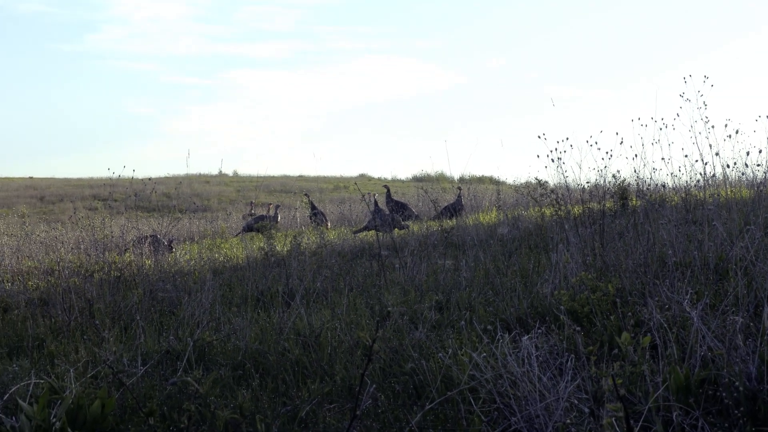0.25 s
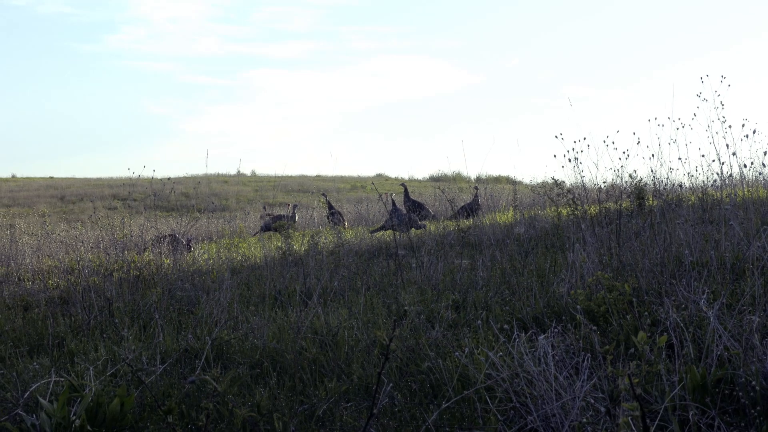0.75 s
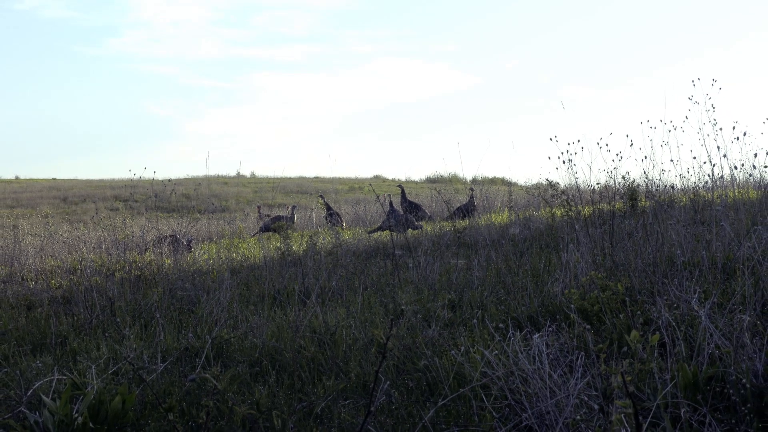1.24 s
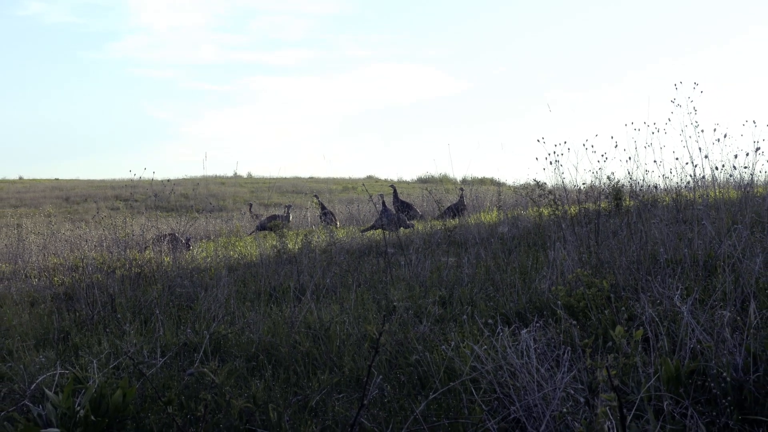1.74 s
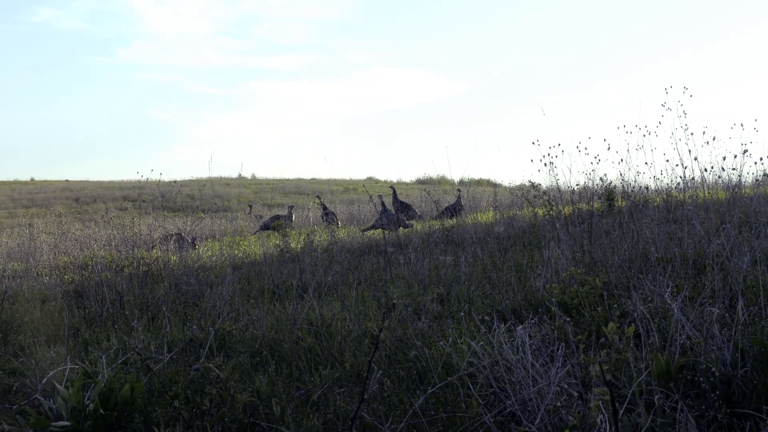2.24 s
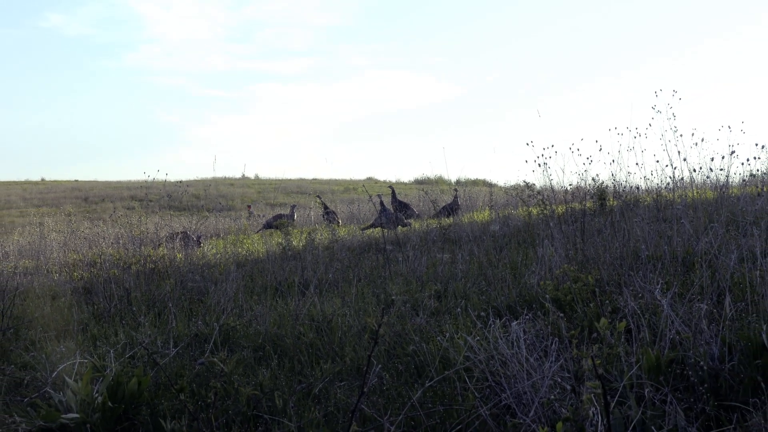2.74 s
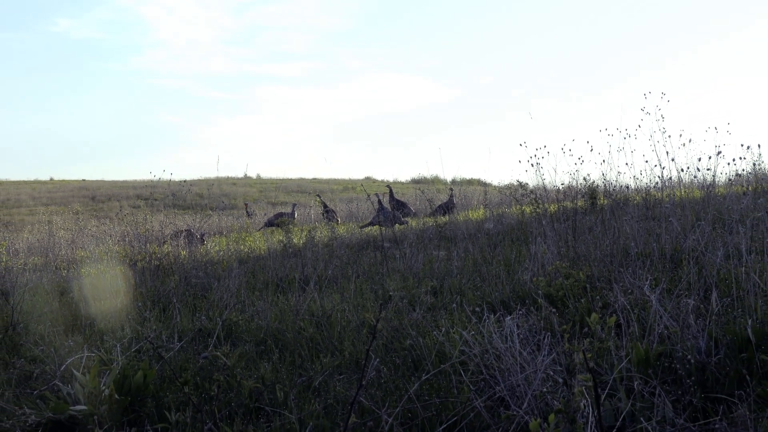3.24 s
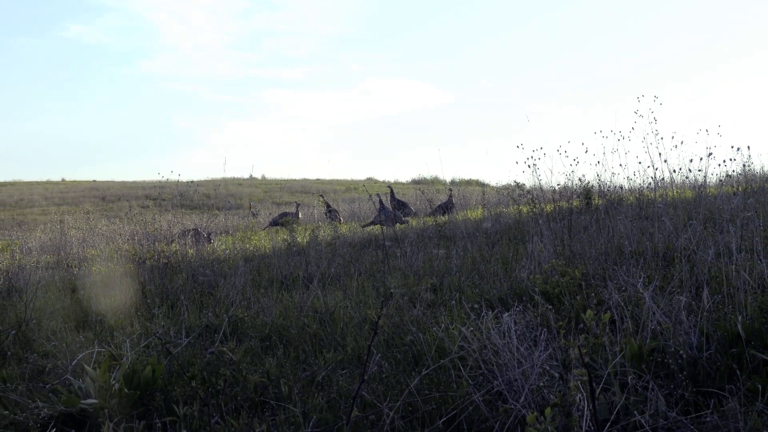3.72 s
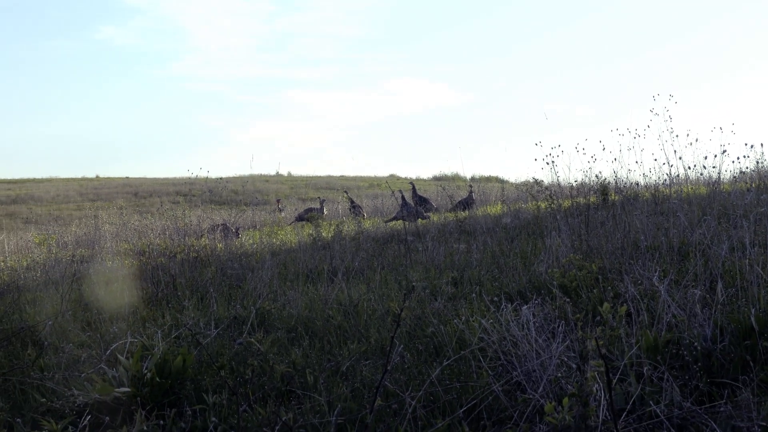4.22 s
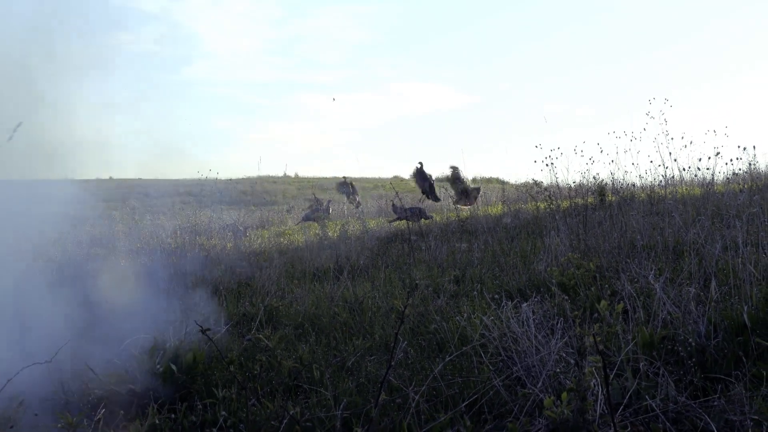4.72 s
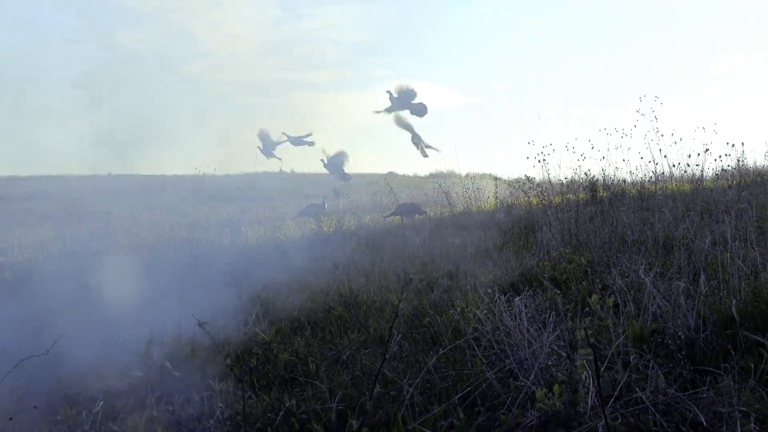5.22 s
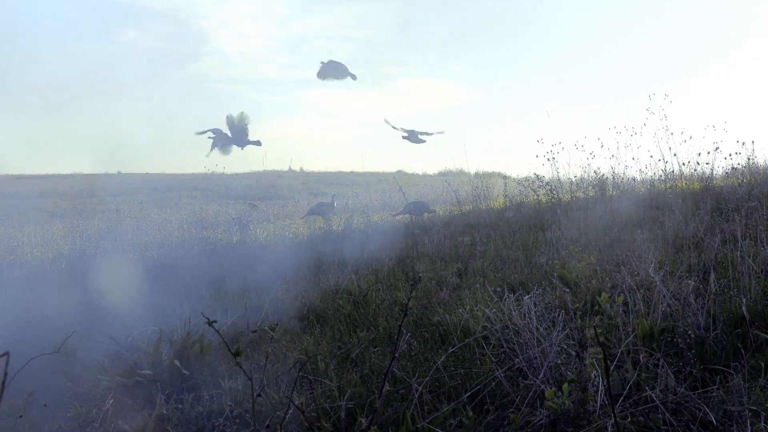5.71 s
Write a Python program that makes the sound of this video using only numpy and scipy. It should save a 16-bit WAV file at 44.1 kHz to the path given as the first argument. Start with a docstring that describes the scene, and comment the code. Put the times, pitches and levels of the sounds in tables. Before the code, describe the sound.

Open grassland on a calm morning: soft breeze, close rustles, one sharp tap near the microphone, and thin whistled bird notes on the right. After four seconds a gritty flint scrape and priming hiss lead instantly into a massive, distorted gunshot. Echo cracks scatter to the right, low boom rolls off the hills and decays, with a small rustle at the end.

```python
"""Flintlock shot over a quiet field

A quiet morning on open grass: a breeze and whistled bird notes built from pitch curves, with rustles close by.
The flint scrapes the steel as gritty noise bursts, the priming flares, and the charge goes off a tenth of
a second after the first scrape: a shock and a noise jet overload the input, and the microphone rings.
Shaped noise scatters the report over the grass, slaps it back from the slopes on the right and rolls it away."""
import sys
import numpy as np
from scipy import signal
from scipy.fft import rfft, irfft, next_fast_len
from scipy.io import wavfile

SR = 44100
rng = np.random.default_rng(int(sys.argv[2]) if len(sys.argv) > 2 else 0)


def pcm_store(signal):
    """Save signal as 16-bit PCM."""
    levels = np.round(np.clip(np.atleast_2d(signal), -1, 1) * 32767)
    wavfile.write(sys.argv[1], SR, levels.astype(np.int16).T)


N = 262874
T = np.arange(N) / SR   # s

# Colour tables give relative density before the noise is brought to unit rms;
# source levels are gains in dB; some sources add a common level of their own.

# far hush, colour: [f/Hz, density/dB per Hz]
HUSH_COLOUR = [(120, -21.5), (200, -5), (345, -9.5), (575, -5.5), (790, -1.5), (1000, -9.5), (1400, -18.5),
               (1900, -27), (3100, -27.5), (5600, -34), (8200, -35), (15500, -39.5)]
# far hush, stereo place: [f/Hz, left-right/dB]
HUSH_PAN = [(200, 7), (400, -4.5), (750, -17.5), (1500, -9.5), (4000, -5), (9000, 4)]
# breeze on the microphone, colour: [f/Hz, density/dB per Hz]
BREEZE_COLOUR = [(20, 5.5), (36, -0.5), (70, 0), (110, -4), (170, -15.5), (300, -23), (700, -57)]
# notes of a low far drone: [t/s, length/s, level/dB]
DRONE_NOTES = [(3.05, .21, -45), (3.56, .48, -45)]
# pitch curves of the song syllables, before each note's own ratio: {name: [t from the start/s, f/Hz]}
SYLLABLES = { "hook": [(0, 4100), (.035, 4580), (.054, 6150), (.074, 5100), (.088, 6100), (.105, 6230)],
             "arch": [(0, 4000), (.05, 4130), (.08, 4600), (.113, 6900), (.145, 4600), (.165, 3700),
             (.195, 3350)], "lift": [(0, 4100), (.024, 5250)], "drop": [(0, 5270), (.045, 3730)],
             "whistle": [(0, 2955), (.17, 3080)], "slur": [(0, 2980), (.015, 3170), (.045, 3240),
             (.068, 3480)], "flick": [(0, 2124), (.02, 2650), (.07, 3780)], "fall": [(0, 3350), (.03, 3150),
             (.085, 2200)], "dip": [(0, 2700), (.032, 1950), (.06, 2650)], "rasp": [(0, 8000),
             (.045, 7140)], }
# the clearest bird notes, by syllable: {name: [t/s, level/dB, pitch ratio]}
SONG = { "hook": [(.066, -50, .97), (.494, -51, .98)], "arch": [(.226, -50, 1), (.653, -48.5, .98)],
        "lift": [(.92, -52, .96), (1.537, -62, .97)], "drop": [(.957, -49, .98), (1.568, -64, .92),
        (2.648, -67, 1)], "whistle": [(.3, -63.5, 1.07), (.47, -62.5, 1), (.995, -58.5, 1),
        (1.13, -66, 1.22), (1.27, -71, 2.03), (1.53, -65, 1.1), (1.54, -66, 1.27), (3.35, -63.5, .9)],
        "slur": [(1.36, -62, 1.05), (1.92, -62, .57), (2.73, -62.5, .81), (2.99, -62, 1.13),
        (3.23, -61, .8), (4.03, -61.5, .83)], "flick": [(1.8, -62, 1.03), (2.05, -62.5, 1.05),
        (2.235, -61.5, 1.05), (2.37, -61.5, .94)], "fall": [(.38, -61, .9), (1.43, -62, .95),
        (1.81, -62, .92)], "dip": [(2.84, -62, 1), (3.515, -62, 1), (4.14, -61, 1)],
        "rasp": [(.77, -54, 1.1), (.825, -50.5, .99), (3.83, -60, .47)], }
# bird calls on two pitches at once: [t/s, level of the lower pitch/dB]
TWIN_CALLS = [(2.522, -54), (3.945, -55)]
# rustles close by: [t/s, level/dB, left-right/dB, decay/s]
RUSTLES = [(0, -50, 6, .38), (0, -46, 4, .03), (.078, -45, -1, .025), (.195, -46, 14, .022),
           (5.7, -46, 5, .12), (5.88, -37.5, 12, .2)]
# rustle colour: [f/Hz, density/dB per Hz]
RUSTLE_COLOUR = [(500, 15), (2000, 6.5), (4500, 2.5), (7000, -1), (10000, 1), (12300, 0.5), (15000, -9)]
# dry ticks close by: [t/s, level/dB]
TICKS = [(1.226, -54), (2.024, -56), (2.778, -55), (3.252, -48), (3.512, -56)]
# soft bumps close by: [t/s, level/dB, left-right/dB]
BUMPS = [(.6595, -34, 10), (1.2015, -40, 6)]
# returns from the far hills: [t/s, level/dB]
HILL_RETURNS = [(4.52, -45), (4.935, -28.5)]
# colour of the hill returns before the air dulls them: [f/Hz, density/dB per Hz]
ROLL_COLOUR = [(30, -5), (75, 2), (125, -1), (250, -7.5), (450, -18.5), (1100, -9), (1500, -9.5),
               (1900, -18), (2700, -21.5), (4500, -31.5), (7000, -42), (13000, -49.5)]
# stereo place of the hill returns: [f/Hz, left-right/dB]
ROLL_PAN = [(60, -13.5), (250, 2.5), (700, -15.5), (2000, -16.5), (10000, -12)]
# strong echoes from slopes and thickets: [t/s, peak level/dB, treble share/dB, thump share/dB]
ECHOES = [(4.483, -5, -4.5, -4), (4.5042, -5.5, -13, -9), (4.5214, -5, -17, -14), (4.572, -9, -17, -18),
          (4.6047, -9, -12, -16), (4.6253, -9.5, -10, -22), (4.669, -11.5, -32, -21),
          (4.695, -9.5, -29, -14.5), (4.747, -16.5, -27, -22), (4.8259, -19.5, -20, -5),
          (4.9485, -19.5, -13, -7), (4.9805, -19.5, -22, -4), (5.08, -19, -16, -14),
          (5.1334, -13, -20, -13), (5.274, -27, -16, -11)]
# colour of the echo cracks: [f/Hz, density/dB per Hz]
ECHO_COLOUR = [(300, -47), (700, -8), (1200, 3), (1900, 6.5), (2700, -1.5), (4000, -10), (7000, -32),
               (14000, -56)]
# sharp cracks on the right after the shot: [t/s, level/dB]
CRACKS = [(4.486, -14), (4.647, -18), (4.826, -28), (4.951, -25), (5.003, -28.5), (5.138, -20),
          (5.282, -36)]
# report thrown back by the field, colour at the start: [f/Hz, density/dB per Hz]
SCATTER_COLOUR = [(30, -17.5), (80, -6), (160, -5.5), (270, -2.5), (420, -9.5), (550, -16.5), (800, -29.5),
                  (1400, -29), (2600, -27), (5000, -29), (15500, -31.5)]
# time for the thrown-back report to fall by 60 dB: [f/Hz, T60/s]
SCATTER_T60 = [(50, 1.85), (130, 1.84), (260, 0.86), (500, 0.3), (2000, 1.6), (5000, 0.98), (12000, 0.62)]
# stereo place of the thrown-back report before it veers: [f/Hz, left-right/dB]
SCATTER_PAN = [(60, -2), (250, 1.5), (700, 15), (1500, -9), (5000, -8.5), (12000, -2.5)]
# flint on steel and the frizzen flying open: [t/s, level/dB, left-right/dB, decay/s]
LOCK_BITES = [(4.2479, -9.5, 25, 0.0044), (4.2536, -8, -2, 0.0064), (4.26, -24, -19, 0.0084),
              (4.267, -22, 11, 0.0036), (4.2738, -16.5, 8, 0.0023), (4.281, -33, -9, 0.02)]
# scrape colour: [f/Hz, density/dB per Hz]
LOCK_COLOUR = [(59, -29.5), (100, -8), (394, -18.5), (711, -19), (897, -9.5), (1230, -18.5), (2000, -5.5),
               (2270, -10), (2520, -5), (2920, -19), (3320, -13.5), (3930, -15), (8760, -21), (9730, -15),
               (15500, -24.5)]
# priming flame colour: [f/Hz, density/dB per Hz]
FLARE_COLOUR = [(40, -12), (150, -3.5), (400, 4.5), (650, -7), (1200, -13), (3000, -24.5), (14000, -28)]
# muzzle gas jet colour: [f/Hz, density/dB per Hz]
JET_COLOUR = [(40, -14), (150, -9), (330, 0), (450, 3), (600, -15.5), (900, -10), (2000, -15), (6000, -19),
              (15000, -28.5)]

FLASH_S, FIRE_S = 4.278, 4.352   # the priming flashes; flame and gas jet reach their top


def from_db(db):
    """Decibels to gain."""
    return 10 ** (np.asarray(db) / 20)


def rms_one(x):
    """Scale to unit rms."""
    return x / np.sqrt(np.mean(x ** 2) + 1e-20)


def at_hz(points, hz):
    """Read a table on a log-frequency axis."""
    points = np.array(points)
    return np.interp(np.log(np.maximum(hz, 1)), np.log(points[:, 0]), points[:, 1])


def panned(pan_db):
    """Left and right gains of constant power; positive leans left."""
    gains = from_db(np.array([[.5], [-.5]]) * pan_db)
    return gains / np.sqrt(np.mean(gains ** 2, axis=0))


def drift(per_s):
    """A random wander of unit rms that heads for a new value per_s times a second."""
    return rms_one(np.interp(T * per_s, np.arange(N), rng.standard_normal(N)))


def noise(spectrum, pan=None, grain_db=0):
    """Stereo noise of a given colour and unit rms; grain roughens its level into tiny pulses."""
    size = next_fast_len(N)
    hz = np.arange(size // 2 + 1) * SR / size
    grain = from_db(grain_db * np.clip(drift(2500), -2, 2))
    white = rng.standard_normal((2, N)) * grain
    low_cut = hz ** 2 / (hz ** 2 + 20 ** 2)
    gain = from_db(at_hz(spectrum, hz)) * low_cut
    if pan is not None:
        gain = gain * panned(at_hz(pan, hz))
    return rms_one(irfft(rfft(white, size) * gain, size)[:, :N])


def bands(x, count=12):
    """Split a sound into overlapping bands that sum to the whole."""
    size = next_fast_len(N)
    spectrum, hz = rfft(x, size), np.arange(size // 2 + 1) * SR / size
    centres = np.geomspace(45, 14000, count)
    for centre, weights in zip(centres, np.eye(count)):
        yield centre, irfft(spectrum * np.interp(hz, centres, weights), size)[:, :N]


def burst(start, rise, decay):
    """Envelope with a quick rise and an exponential fall."""
    age = np.maximum(T - start, 0)
    return (1 - np.exp(-age / rise)) * np.exp(-np.minimum(age / decay, 40))


def hump(start, length):
    """Envelope that swells and fades evenly."""
    return np.sqrt(np.maximum(np.sin(np.pi * np.clip((T - start) / length, 0, 1)), 0))


def surge(top, rise_db_per_s, fall_db_per_s, hold=0):
    """Envelope that grows exponentially to its top, holds and dies away."""
    before = rise_db_per_s * np.maximum(top - T, 0)
    after = fall_db_per_s * np.maximum(T - top - hold, 0)
    return from_db(-np.minimum(before + after, 200))


def ring(start, hz, decay):
    """A damped sine."""
    age = np.maximum(T - start, 0)
    return np.sin(2 * np.pi * hz * age) * np.exp(-np.minimum(age / decay, 40))


def snaps(rows):
    """Very short bright bursts, one for each row of time and level."""
    shape = sum(from_db(db) * burst(s, 0.00025, 0.0026) for s, db in rows)
    return shape * noise([(300, -6), (1800, -2), (4500, 5), (8000, -4), (15000, -10.5)])


def field_blur(x, decay_s):
    """Many faint reflections from the grass smear a sound, differently on each side."""
    length = SR // 2
    paths = rng.standard_normal((2, length)) * np.exp(-T[:length] / decay_s)
    return signal.fftconvolve(x[None], rms_one(paths) / np.sqrt(length), axes=1)[:, :N]


def whistle(name, start, ratio, wander, tempo=1):
    """One syllable, fading as it goes and thinner when high: the samples it covers and its wave."""
    fade_db, taper = -3.5, .2   # loss from start to end; share of the note spent swelling and dying
    thin_above_hz, thin_db_per_octave = 5400, -16
    age, hz = np.transpose(SYLLABLES[name])
    t = np.arange(0, age[-1], tempo / SR)
    span = int(max(start, 0) * SR) + np.arange(len(t))
    pitch = ratio * np.interp(t, age, hz)
    octaves_over = np.maximum(np.log2(pitch / thin_above_hz), 0)
    level_db = fade_db * t / age[-1] + thin_db_per_octave * octaves_over
    shape = from_db(level_db) * signal.windows.tukey(len(t), taper)
    phase = 2 * np.pi * np.cumsum(pitch * wander[span]) / SR
    return span, shape * np.sqrt(2) * np.sin(phase)


def breeze():
    """Low noise of wind on the microphone: a slightly swaying breeze with one opening gust."""
    steady = from_db(-43.6 + .6 * drift(4))
    gust = from_db(-39.5) * hump(0, .28)
    return steady * noise(BREEZE_COLOUR) * panned(-7) + gust * noise(BREEZE_COLOUR) * panned(4)


def far_drone():
    """A low far sine whose pitch wavers around 143 Hz."""
    shape = sum(from_db(db) * hump(s, length) for s, length, db in DRONE_NOTES)
    phase = 2 * np.pi * np.cumsum(143 + 2.5 * drift(32)) / SR
    return shape * np.sin(phase) * panned(3)


def insect():
    """A thin buzz: a narrow band of noise pulsing 90 times a second."""
    pulse = 1 + np.sin(2 * np.pi * 90 * T)
    return from_db(-78) * hump(3.0, 1.3) * noise([(7000, -38), (8250, 2), (9700, -41)]) * pulse


def meadow():
    """Breeze on the microphone, far hush, a low drone and an insect."""
    hush = from_db(-50.5) * noise(HUSH_COLOUR, HUSH_PAN)
    return breeze() + hush + far_drone() + insect()


def chorus(level_db=-72, distance_db=-7, blur_db=2, count=150):
    """Farther birds twitter one after another, each note at its own pitch, speed and distance."""
    song, wander = np.zeros(N), 1 + .02 * drift(250)
    names = ["slur", "flick", "fall", "slur"]   # slurs come twice as often
    for k, (when, kind, pitch, speed, distance) in enumerate(rng.random((count, 5))):
        name = names[int(kind * len(names))]
        start = (k + when) / count * 4.3
        span, wave = whistle(name, start, .7 * 1.9 ** pitch, wander, .8 + speed)
        song[span] += from_db(level_db + distance_db * distance) * wave
    return (song + from_db(blur_db) * field_blur(song, decay_s=0.03)) * panned(-14.5)


def trill(wander):
    """A far bird's trill: 29 short notes a second, each sweeping downwards."""
    cycle = np.minimum((T * 29) % 1 / 0.55, 1)   # each note fills 55 % of its slot
    phase = 2 * np.pi * np.cumsum((3500 - 1150 * cycle) * wander) / SR
    return from_db(-66) * hump(3.03, .8) * 2 * np.sin(np.pi * cycle) * np.sin(phase)


def birds(waver=0.01, flutter_db=1.5, wet_db=-12):
    """The nearer birds whistle on the right; fast pitch wander makes some notes rasp or warble."""
    song, clean = np.zeros(N), 1 + waver * drift(250)
    raspy, warbling, steady = 1 + .05 * drift(900), 1 + .045 * drift(300), 1 + .004 * drift(100)
    rough = {"rasp": raspy, "lift": raspy, "flick": warbling, "dip": warbling, "whistle": steady}
    notes = [(name, *call) for name, calls in SONG.items() for call in calls]
    for start, level_db in TWIN_CALLS:
        notes.append(("slur", start, level_db, 1))
        notes.append(("slur", start, level_db - 6.5, 1.31))   # the weaker upper pitch
    for name, start, level_db, ratio in notes:
        span, wave = whistle(name, start, ratio, rough.get(name, clean))
        song[span] += from_db(level_db) * wave
    song += trill(clean)
    song *= from_db(flutter_db * drift(120))
    return song * panned(-29) + from_db(wet_db) * field_blur(song, decay_s=0.12) * panned(-9.5)


def rustle():
    """A soft close rustle of swelling grainy noise, and dry ticks."""
    attack_share = .3   # swell time as a share of the decay
    soft = sum(from_db(db) * panned(pan) * burst(s, attack_share * decay, decay)
               for s, db, pan, decay in RUSTLES)
    return soft * noise(RUSTLE_COLOUR, grain_db=2.5) + snaps(TICKS) * panned(5)


def bump():
    """Soft bumps close by, each a dull ring with a little click."""
    return sum(from_db(db) * (ring(s, 404, .004) + .8 * ring(s, 1500, .001)) * panned(pan)
               for s, db, pan in BUMPS)


def knock(start=.6336):
    """One sharp tap next to the left microphone: a snap and a short thud, as damped sines."""
    snap = from_db(-1.5) * ring(start, 1800, 0.00014)
    body = from_db(-18) * ring(start + 0.00034, 750, 0.00036)
    thud = from_db(-17.5) * ring(start + 0.0019, 142, 0.0029)
    return (snap - body + thud) * panned(24)


def roll(air_loss_db=-1.0, patchy_db=2.1):
    """Far hills answer in a long roll that the air makes duller as its path grows."""
    out, together = 0, drift(35)
    for hz, band in bands(noise(ROLL_COLOUR, ROLL_PAN, grain_db=2.5)):
        loss = air_loss_db * np.sqrt(hz / 100) * np.clip(T - 5.3, -.35, .6)
        patches = patchy_db * (together + drift(30)) / 2   # partly shared by all bands
        out = out + band * from_db(loss + patches)
    attack_s, decay_s = .06, .62
    return out * sum(from_db(db) * burst(s, attack_s, decay_s) for s, db in HILL_RETURNS)


def crackle(spread_db=6, count=4):
    """Sharp cracks on the right, with fainter ones scattered among them at random."""
    faint = [(4.98 + .16 * when, -34 + spread_db * (size - .5)) for when, size in rng.random((count, 2))]
    return snaps(CRACKS + faint) * panned(-18)


def rebound(start=4.418, length=.055, level_db=-12):
    """Envelope of the boom that the nearest bank throws back as one dull swell."""
    return from_db(level_db) * hump(start, length)


def weak_echoes(count, spread_db, treble_db, thump_db):
    """Weak echoes, one at random in each equal slot, that sink as they come later."""
    first_s, span_s, level_db, fall_db_per_s = 4.41, .9, -22.5, 10
    rows = []
    for k, (when, size) in enumerate(rng.random((count, 2))):
        delay = span_s * (k + when) / count
        peak_db = level_db - fall_db_per_s * delay + spread_db * (size - .5)
        rows.append((first_s + delay, peak_db, treble_db, thump_db))
    return rows


def echoes(body_db=-8.0, treble_db=-5.5, weak_spread_db=4, weak_treble_db=-19, weak_thump_db=-5, count=24):
    """Each slope returns a cluster of small cracks with a dull thump under it; later ones lie farther right."""
    swell_s = .0053
    body, treble, thump = 0, 0, 0
    for start, peak_db, bright_db, thump_db in ECHOES + weak_echoes(
            count, weak_spread_db, weak_treble_db, weak_thump_db):
        age = np.clip((T - start) / swell_s, 0, 40)
        shape = from_db(peak_db) * age * np.exp(1 - age)
        body = body + shape
        treble = treble + from_db(bright_db) * shape
        thump = thump + from_db(thump_db) * shape
    bright_noise = noise([(1500, -34), (4000, 4.5), (8000, -9.5), (15000, -19)], grain_db=5)
    dull_noise = noise([(40, -8), (120, -0.5), (260, -2.5), (400, -10), (600, -21.5), (1200, -47)])
    cracks = from_db(body_db) * body * noise(ECHO_COLOUR, grain_db=5)
    cracks = cracks + from_db(treble_db) * treble * bright_noise
    veer = 1 - np.exp(-np.maximum(T - 4.46, 0) / .07)
    return cracks * panned(-22 * veer) + (thump + rebound()) * dull_noise


def scatter(start=4.352, level_db=-7.5, veer_db_per_s=-22):
    """Grass and ground throw the report back; each band dies at its own pace as the sound veers right."""
    age = np.maximum(T - start, 0)
    back = noise(SCATTER_COLOUR, SCATTER_PAN, grain_db=3)
    tail = sum(band * from_db(-60 * age / at_hz(SCATTER_T60, hz)) for hz, band in bands(back))
    swell = 1 - np.exp(-age / 0.015)
    return from_db(level_db) * tail * swell * panned(veer_db_per_s * np.minimum(age, .5))


def lock():
    """The flint scrapes down the steel in gritty bites; the priming flashes, its flame growing until the shot."""
    bites = sum(from_db(db) * panned(pan) * burst(s, 0.0009, decay) for s, db, pan, decay in LOCK_BITES)
    scrape = from_db(5) * bites * noise(LOCK_COLOUR, grain_db=6)
    flash = from_db(-19) * surge(FLASH_S, rise_db_per_s=3500, fall_db_per_s=1100)
    flame = from_db(-5) * surge(FIRE_S, rise_db_per_s=570, fall_db_per_s=4000) * (T > FLASH_S)
    return scrape + (flash * panned(14) + flame * panned(5.8)) * noise(FLARE_COLOUR, grain_db=5.5)


def blast(start=4.3475, mic_ring_hz=440, slow_ring_hz=58):
    """The shock sets the microphone ringing, near 440 Hz and slowly at 58 Hz, under the gas jet's tearing noise."""
    age = np.maximum(T - start, 0) / 0.0023
    # pressure jumps up, falls through zero and recovers
    shock = from_db(3.5) * (T > start) * (1 - age) * np.exp(-np.minimum(age, 40))
    mic_ring = from_db(3.5) * ring(4.3478, mic_ring_hz, .006)
    slow_ring = from_db(10.5) * ring(4.3535, slow_ring_hz, .014) * burst(4.3535, 0.0071, 1)
    jet = from_db(4.5) * surge(FIRE_S, rise_db_per_s=2700, fall_db_per_s=1400, hold=.01)
    tear = jet * noise(JET_COLOUR, grain_db=3) * panned(-7.5)
    return (shock + slow_ring) * panned(-9.5) + mic_ring * panned(1) + tear


def scene():
    """The quiet field, the shot and its answers."""
    field = meadow() + chorus() + birds() + rustle() + bump() + knock()
    answers = roll() + crackle() + echoes() + scatter()
    return field + answers + lock() + blast()


def record(dry):
    """The input overloads, flattening peaks near full scale, and the top is cut."""
    clipped = dry / (1 + (dry / .95) ** 8) ** (1 / 8)
    cutoff_hz = 15800
    low_pass = signal.ellip(10, .1, 60, cutoff_hz, fs=SR, output="sos")
    return np.clip(signal.sosfilt(low_pass, clipped), -1, 1)


dry = scene()
out = record(dry)
pcm_store(out)
```